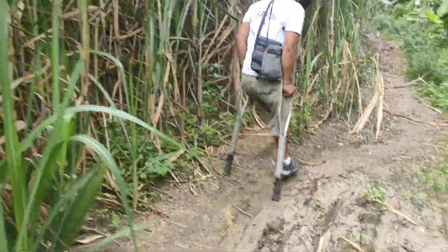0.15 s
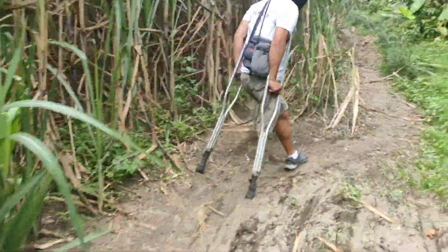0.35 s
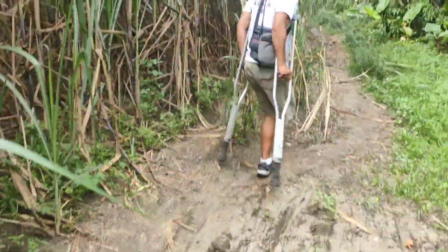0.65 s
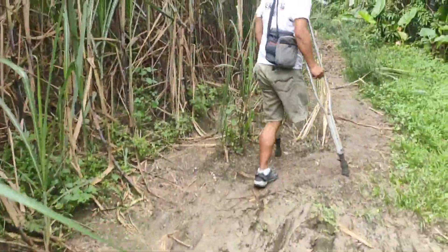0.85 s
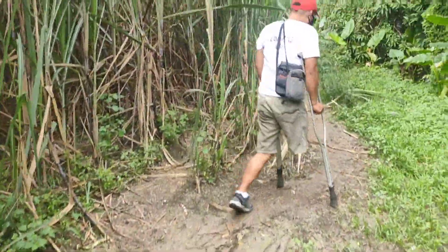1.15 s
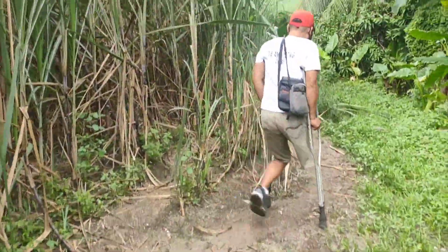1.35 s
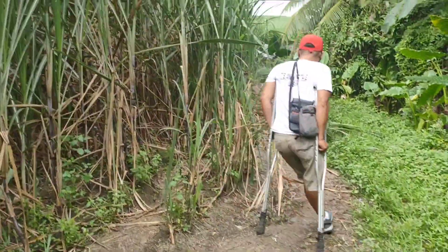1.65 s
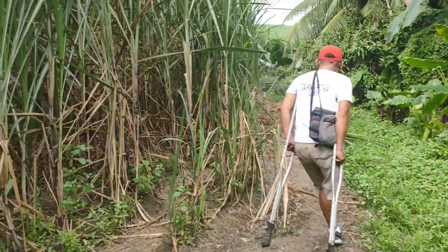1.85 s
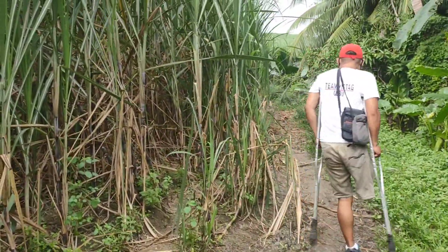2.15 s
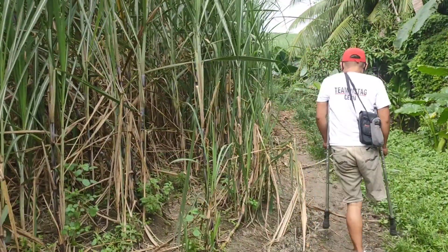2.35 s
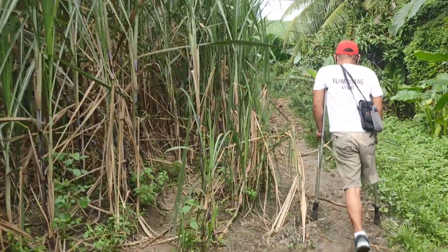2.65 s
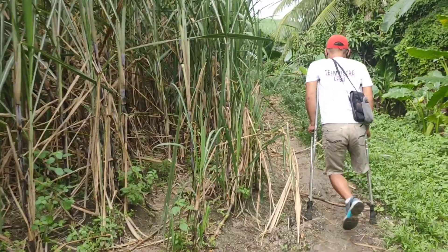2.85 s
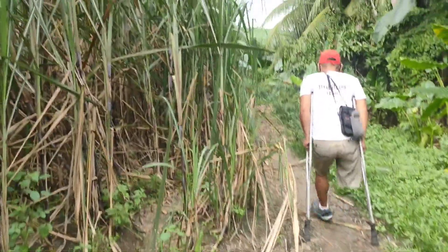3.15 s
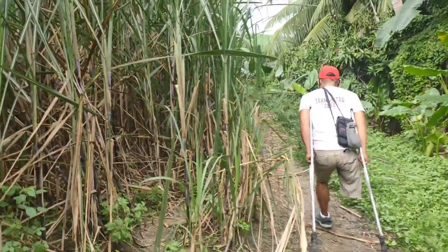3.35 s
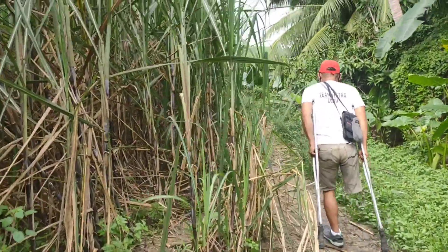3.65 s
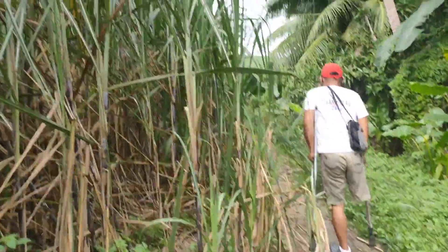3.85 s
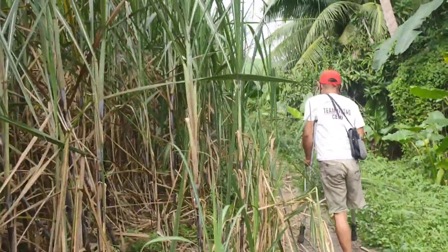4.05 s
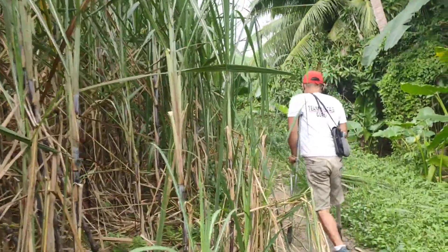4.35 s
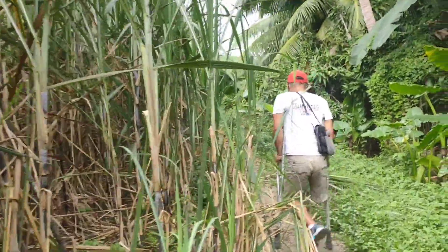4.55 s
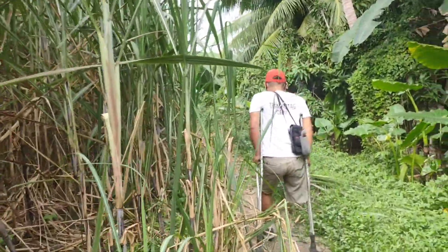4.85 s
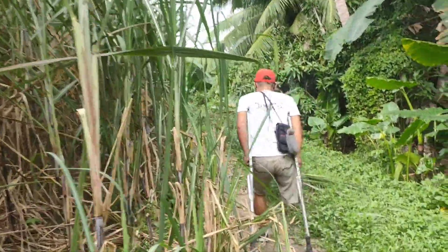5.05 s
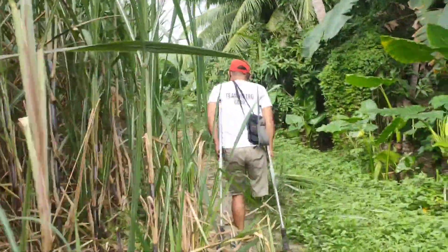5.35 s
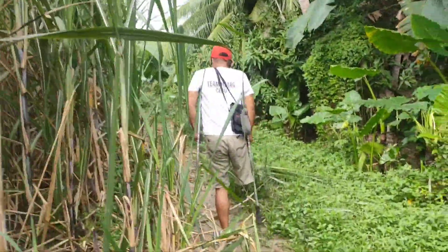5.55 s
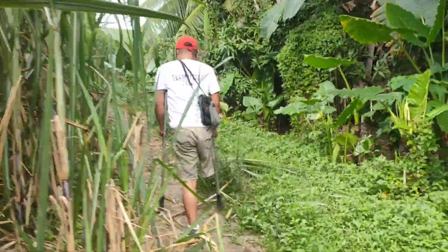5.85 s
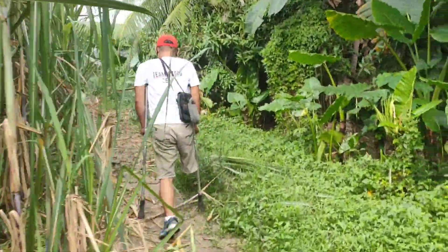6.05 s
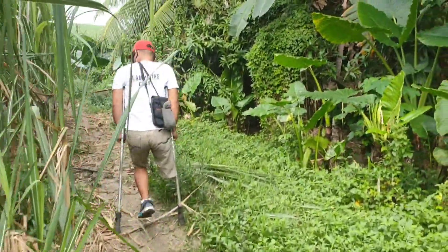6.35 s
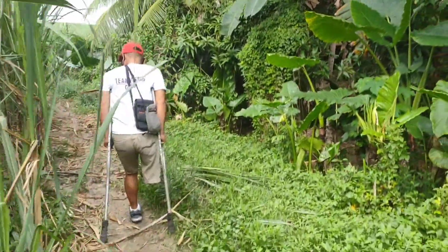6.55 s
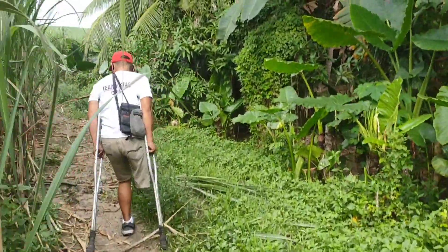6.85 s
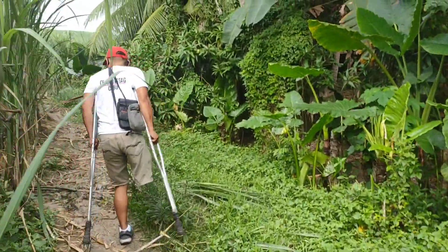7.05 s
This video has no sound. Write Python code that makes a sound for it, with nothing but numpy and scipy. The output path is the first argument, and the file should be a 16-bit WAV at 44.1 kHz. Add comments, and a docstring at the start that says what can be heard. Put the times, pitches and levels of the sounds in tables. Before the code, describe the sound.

Uneven soft pats, crisp crunches and crutch rattles over faint outdoor hiss, with one loud dry snap near six seconds and close leaf rustling.

```python
"""A muddy path beside a cane field, where a man walks past on metal crutches.
The crutches clack, tips and shoe pat the mud, dry litter crunches and a cane stalk cracks under a tip: noise
bursts shaped by resonances, with a short scattered tail. Leaves rustle and brush past close by as clumpy
hiss with clicks, light wind touches the microphones as low noise, and a small metal part tinks as narrow
rings. Behind lie coloured noise for hiss, rumble, throb and insects, and sine tones for a hum and whistle."""
import sys
import numpy as np
from scipy import signal
from scipy.fft import rfft, irfft, next_fast_len
from scipy.io import wavfile
from scipy.ndimage import uniform_filter1d, map_coordinates

SR = 44100
rng = np.random.default_rng(int(sys.argv[2]) if len(sys.argv) > 2 else 0)


def wrap_up_sound(samples):
    """Save the sound to the file named by the first command line argument, as 16-bit audio."""
    columns = np.atleast_2d(samples).T
    # keep every value between -1 and 1, then stretch to whole-number steps
    tamed = np.clip(columns, -1, 1)
    steps = np.round(tamed * 32767).astype(np.int16)
    wavfile.write(sys.argv[1], SR, steps)


N = 317961
TIME = np.arange(N) / SR  # s

# Spectra, here and below. Each row: frequency in Hz, relative density in dB per Hz.
# Level curves, here and below. Each row: time in s, level in dB.
# Likeness of left and right. Each row: frequency in Hz, correlation from -1 to 1.
# Far foliage hiss: spectrum, level curve, likeness.
AIR_SPECTRUM = [(50, -35), (100, -2.5), (310, -1.5), (750, -6.5), (1700, -10), (5500, -13), (7400, -11),
                (11400, -14.5), (13000, -21.5), (15800, -12.5)]
AIR_LEVEL = [(0, -54), (2.3, -55), (3.2, -53.5), (5.6, -53.5), (6.35, -53.5), (7.2, -52)]
AIR_LIKENESS = [(130, 1), (290, 0.83), (640, 0.082), (1400, 0.14), (3100, -0.057)]
# Low rumble: spectrum, level curve, likeness.
RUMBLE_SPECTRUM = [(10, -10), (35, -5), (65, 0.5), (100, -2.5), (160, -13.5), (1500, -41)]
RUMBLE_LEVEL = [(0, -62.5), (1, -55.5), (1.5, -59.5), (4.5, -62.5), (6, -55.5), (7.2, -51.5)]
RUMBLE_LIKENESS = [(30, 1.0), (150, 0.92)]
# Deep throb: spectrum, level curve.
THROB_SPECTRUM = [(25, -57), (48, 20.5), (56, 33), (66, -20), (300, -74)]
THROB_LEVEL = [(1.8, -68.5), (5.4, -60.5), (7.2, -55)]
# Insect chorus: spectrum.
INSECT_SPECTRUM = [(3000, -52), (6200, -14), (6900, 1), (7300, 8), (7900, 1), (9300, 0.5), (11000, -16),
                   (16000, -49)]
# Faint far hum: level curve.
HUM_LEVEL = [(0, -68), (.88, -65), (1.0, -70)]
# Faint far whistle. Each row: time in s, pitch in Hz, level in dB.
WHISTLE = [(.15, 988, -72), (.2, 1065, -64), (.245, 1010, -69)]
# Wind on the microphones. Each row: centre in s, level in dB, length in s, left over right in dB.
GUSTS = [(1.726, -50.5, 0.073, 21.5), (6.778, -52.5, 0.035, 24), (6.942, -42, 0.059, 3)]
# Wind: spectrum.
GUST_SPECTRUM = [(15, -6), (60, 9.5), (110, -3), (170, -25), (1500, -89)]
# Sweeps of a leg or crutch through dry leaves. Each row: time of height in s, level in dB, length in s.
SWISHES = [(0.42, -54, 0.04), (0.687, -50, 0.04), (0.954, -49.5, 0.082), (1.042, -53, 0.039),
           (1.21, -51, 0.018), (1.735, -56, 0.013), (1.776, -54, .014), (2.88, -56.5, 0.11),
           (3.088, -49, 0.013), (3.196, -50.5, 0.11), (3.447, -55, 0.035), (3.874, -56, 0.059),
           (4.14, -51.5, 0.11), (4.188, -43.5, 0.015), (4.218, -46, 0.015), (4.281, -46, 0.017),
           (4.427, -56, 0.13), (4.847, -57.5, 0.1), (5.3, -55, 0.054), (5.484, -55.5, 0.074),
           (7.176, -53.5, 0.036)]
# Dry leaves: spectrum.
RUSTLE_SPECTRUM = [(300, -6.5), (1000, -11), (3000, -10.5), (6500, -8), (8300, -2.5), (9500, -2),
                   (11200, -10), (15500, -12.5)]
# Balance of all leaves. Each row: frequency in Hz, left over right in dB.
LEAF_BALANCE = [(7000, 0), (9800, 9), (11000, 9.5), (13500, 0)]
# Leaves: likeness.
LEAF_LIKENESS = [(300, 1), (1400, -0.22), (3100, -0.35), (7000, 0.096)]
# Leaves sliding past close by. Each row: time of height in s, level in dB, build-up in s, release in s,
# top from pointed (1; less acts as 1) to round (2).
BRUSHES = [(5.78, -38.5, 0.082, 0.1, 1.12), (7.003, -32.5, 0.11, 0.061, 0.77)]
# One spectrum per brushing leaf.
BRUSH_SPECTRA = [
    [(150, -12), (440, 4.5), (1100, -8.5), (1650, -0.5), (2250, 0), (2850, -11), (3600, -4), (4700, 3),
     (5750, -3), (6700, 2), (7700, -3.5), (9700, 3), (12000, -5), (15800, -8.5)],
    [(150, -14), (650, 0), (1400, -6.5), (2800, -6), (4700, -3), (6800, -1.5), (9200, 3.5), (11300, -5),
     (16000, -4)],
]
# Leaf edge snags and lets go. Each row: time of height in s, level in dB.
SNAGS = [(5.663, -39.5), (5.686, -44.5), (5.985, -44.5), (6.744, -41), (6.788, -42.5), (6.83, -41),
         (6.864, -37), (6.892, -42), (6.981, -35)]
# Leaf flapping as it slips off: spectrum.
FLAP_SPECTRUM = [(200, -28), (550, 0), (800, 0.5), (1100, -8), (8000, -23)]
# Tinks of the small metal part. Each row: time of height in s, level in dB.
TINKS = [(1.549, -50), (2.014, -53), (3.855, -55), (5.25, -54)]
# Shoe and rubber tips landing in mud. Each row: start in s, level in dB, fall in s (at least 0.001),
# pitch of the pat in Hz.
STEPS = [(0.379, -41.5, 0.0036, 700), (0.391, -42, 0.0059, 1440), (0.401, -39, 0.0063, 213),
         (0.9054, -35, 0.0041, 800), (1.117, -43, 0.024, 1400), (1.236, -45.5, 0.01, 885),
         (2.6215, -43, 0.015, 1800), (3.733, -45, 0.01, 297), (3.815, -45.5, 0.011, 686),
         (3.9397, -29, 0.0012, 1200), (3.9407, -27, 0.00091, 3000), (4.2862, -37, 0.0024, 1210),
         (4.437, -42.5, .003, 2000), (6.131, -44.5, 0.011, 790), (6.466, -42, 0.011, 1400),
         (7.172, -45.5, 0.086, 740)]
# Leaves and twigs crunched under a tip. Each row: time in s, level in dB, left over right in dB,
# build-up in s, fall in s, favoured pitch in Hz.
CRUNCHES = [(0.526, -32.5, 3.5, 0.0023, 0.0057, 11000), (1.0713, -30, 11, 0.00033, 0.00067, 9800),
            (3.378, -38, -3, .003, .005, 8600), (3.7365, -25, -10, 0.00089, 0.0006, 8900),
            (3.735, -26.5, 1, 0.0067, 0.0051, 6800), (3.777, -35, 8, 0.0034, 0.0044, 10800),
            (4.205, -33, 2, .002, 0.0036, 9000), (5.246, -34, -2, 0.0023, 0.009, 9000),
            (6.599, -37.5, 5, 0.0036, 0.003, 13000)]
# Resonance of the litter. Each row: pitch in Hz, width in Hz, level in dB.
LITTER_MODES = [(8260, 1500, 3)]
# Direct sound of the crunches: spectrum.
LITTER_TICK = [(150, -26), (500, -2), (4000, -5.5), (8000, 4.5), (16000, -3.5)]
# Fibres of the dry stalk breaking. Each row: time in s, level in dB, left over right in dB,
# build-up in s, fall in s, favoured pitch in Hz.
CRACKS = [(5.9996, -10.5, -.5, 0.00089, 0.00079, 6850), (6.0007, -11.5, -0.55, 0.00024, 0.0021, 10500)]
# Resonances of the stalk. Each row: pitch in Hz, width in Hz, level in dB.
STALK_MODES = [(3230, 470, -13), (5930, 480, -1), (6720, 480, -4), (7790, 260, -2), (9880, 400, 1),
               (11200, 500, -7)]
# Direct sound of the cracks: spectrum.
CRACK_TICK = [(150, -15), (500, -15), (1700, -10), (4200, -21), (5300, -1), (10000, -0.5), (16000, -3)]
# Crutch rattles. Each row: time in s, level in dB, left over right in dB, build-up in s, fall in s,
# favoured pitch in Hz.
CLACKS = [(1.1028, -34, 1, 0.0006, 0.004, 4200), (1.1137, -16.5, -10, 0.00016, 0.00034, 5970),
          (1.116, -21, 1, 0.0012, 0.0017, 9900), (1.1267, -20, -1, 0.0007, 0.0009, 7040),
          (1.1288, -31, -4, 0.00027, 0.002, 4720), (2.619, -30.5, 9, 0.00029, 0.0016, 4800),
          (2.6232, -35.5, -2, 0.012, 0.0055, 7000), (2.640, -41.5, -1, .003, 0.027, 5660),
          (3.941, -33, -2, 0.00047, 0.001, 5670), (4.2877, -36, -6, 0.0005, 0.0031, 8000),
          (5.975, -38, -6, 0.0012, 0.0041, 4000)]
# Resonances of the crutch tube. Each row: pitch in Hz, width in Hz, level in dB.
TUBE_MODES = [(4080, 200, 0.5), (4560, 260, 3), (6480, 240, -1), (7700, 300, 0), (8400, 400, 5),
              (9780, 240, 3), (14900, 500, -4)]
# Direct sound of the clacks: spectrum.
CLACK_TICK = [(150, -26), (400, 4), (3000, 0), (8500, 8), (12000, 1.5), (16000, 8)]

HUM_HZ = 278.7
SWISH_RISE, SWISH_FALL, SWISH_ROUND = 1, 1.91, 2.2  # rise and fall as shares of the length
SNAG_RISE_S, SNAG_FALL_S, SNAG_ROUND = 0.008, 0.017, 1
FLAP_S, FLAP_DB, FLAP_RISE_S, FLAP_FALL_S, FLAP_ROUND = 6.993, -39.5, .02, .016, 2
CATCH_DB = -10  # clicks of catching edges against the sliding hiss
GRAIN_DB, GRAINS_PER_S = 1.1, 330  # stick and slip in small clumps
SWISH_PATCH_DB, BRUSH_PATCH_DB = 4.5, 3.5  # depth of the flicker in narrow bands
TINK_HZ, TINK_WIDTH_HZ, TINK_RISE_S, TINK_FALL_S, TINK_ROUND = 12130, 400, .003, .010, 2.4
SPOT_DB, SPOT_OCTAVES = 5.5, 0.2  # the struck spot favours one range of pitch
IMPACT_SPREAD_DB = 5  # inequality of the tiny impacts in a snap
TUBE_RING_DB, LITTER_RING_DB, STALK_RING_DB = 13.5, -1, 5
SPLINTER_S, SPLINTER_DB, SPLINTER_RISE_S, SPLINTER_FALL_S = 6.003, -34, .002, 0.028
SPLINTER_HZ, SPLINTER_WIDTH_HZ = 9930, 450
EDGE_HZ, OFFSET = 15800, .0028


def gain_of(db):
    """Decibels to gain."""
    return 10 ** (np.asarray(db) / 20)


def evened(x):
    """Scales to rms 1."""
    return x / np.sqrt(np.mean(x ** 2) + 1e-20)


def read(points, hz):
    """Interpolates a table on a log-frequency axis."""
    f, value = np.transpose(points)
    return np.interp(np.log(hz + 1), np.log(f + 1), value)


def level(rows):
    """A dB curve as a gain per sample, silent outside its span."""
    s, db = np.transpose(rows)
    inside = 1. * ((TIME > s[0] - .02) & (TIME < s[-1] + .02))
    return gain_of(np.interp(TIME, s, db)) * uniform_filter1d(inside, 441)


def sides(pan_db):
    """Left and right gains for a level difference."""
    return gain_of(np.array([[.5], [-.5]]) * pan_db)


def add(mix, s, sound):
    """Adds a stereo sound at time s."""
    part = mix[:, max(round(s * SR), 0):][:, :sound.shape[1]]
    part += sound[:, :part.shape[1]]


def white():
    """Two unrelated noises."""
    return rng.standard_normal((2, N))


def wander(per_s):
    """A random curve of rms 1 with per_s new values a second."""
    return evened(np.interp(TIME * per_s, np.arange(8000), rng.standard_normal(8000)))


def colour(x, spectrum, likeness=None, balance=None):
    """Gives a stereo pair a spectrum, a left-right likeness and a balance; rms 1."""
    size = next_fast_len(N)
    z, hz = rfft(x, size), np.fft.rfftfreq(size, 1 / SR)
    if likeness is not None:
        c = np.clip(read(likeness, hz), -1, 1)
        z = np.array([z[0], c * z[0] + np.sqrt(1 - c ** 2) * z[1]])
    if balance is not None:
        z = z * sides(read(balance, hz))
    return evened(irfft(z * gain_of(read(spectrum, hz)), size)[:, :N])


def patchy(x, depth_db, width_hz, length_s):
    """Narrow bands of the noise swell and fade independently, giving an uneven, flickering hiss."""
    z = signal.stft(x, nperseg=512, noverlap=384)[2]
    band = np.arange(z.shape[1]) * SR / 512 / width_hz
    moment = np.arange(z.shape[2]) * 128 / SR / length_s
    grid = np.meshgrid(band, moment, indexing="ij")
    patches = evened(map_coordinates(rng.standard_normal((200, 900)), grid, order=1, mode="wrap"))
    z = z * gain_of(depth_db * np.tanh(patches))
    return signal.istft(z, nperseg=512, noverlap=384)[1][:, :N]


def tone(hz, rows):
    """A sine with a level curve."""
    return level(rows) * np.sqrt(2) * np.sin(2 * np.pi * np.cumsum(hz) / SR)


def swell(s, db, rise_s, fall_s, roundness):
    """A gain that builds up to its height at time s and dies away."""
    away = np.maximum((s - TIME) / max(rise_s, 1e-3), (TIME - s) / max(fall_s, 1e-3))
    return gain_of(db) * np.exp(-np.minimum(away, 20) ** max(roundness, 1))


def together(gains):
    """Overlapping swells add in power."""
    return np.sqrt(sum(gain ** 2 for gain in gains))


def ringing(hz, width_hz):
    """A narrow, slightly unsteady ring of rms 1: noise through a resonance twice."""
    ring = signal.iirpeak(hz, hz / width_hz, SR)
    return evened(signal.lfilter(*ring, signal.lfilter(*ring, white())))


def air():
    """Far foliage hiss: noise whose bands flicker independently."""
    hiss = patchy(white(), depth_db=4.5, width_hz=148.2, length_s=0.037)
    return level(AIR_LEVEL) * colour(hiss, AIR_SPECTRUM, AIR_LIKENESS)


def rumble():
    """Low noise, nearly alike on both sides."""
    return level(RUMBLE_LEVEL) * colour(white(), RUMBLE_SPECTRUM, RUMBLE_LIKENESS)


def throb():
    """Deep narrow-band noise, identical on both sides; its narrow band makes it beat."""
    return level(THROB_LEVEL) * colour(white(), THROB_SPECTRUM)[0]


def insects():
    """A chorus blended into a band of noise, stronger on the right, its level wavering slightly."""
    return gain_of(-61.0 + 2.0 * wander(14)) * sides(-5.0) * colour(white(), INSECT_SPECTRUM)


def hum():
    """A faint far sine, unsteady in pitch and level."""
    return tone(HUM_HZ * (1 + 0.012 * wander(31.4)), HUM_LEVEL) * gain_of(2.0 * wander(19.0))


def whistle():
    """A faint far sine gliding up and back down."""
    s, hz, db = np.transpose(WHISTLE)
    return tone(np.interp(TIME, s, hz), np.transpose([s, db]))


def wind():
    """Each gust is a bell-shaped swell of low noise that buffets one microphone more than the other."""
    gusts = 0
    for s, db, length_s, pan_db in GUSTS:
        gusts = gusts + gain_of(db) * sides(pan_db) * np.exp(-.5 * ((TIME - s) / length_s) ** 2)
    return gusts * colour(white(), GUST_SPECTRUM)


def leaves(pressure, spectrum, catches_per_s, flutter_db, patch_db):
    """Rough leaf edges catch and slip: tiny clicks of uneven size over a sliding, clumpy hiss."""
    caught = rng.random(N) < catches_per_s / SR
    clicks = np.minimum(rng.exponential(1, N), 3) * caught * white()
    friction = gain_of(CATCH_DB) * evened(clicks) + white()
    friction *= gain_of(flutter_db * wander(90) + GRAIN_DB * wander(GRAINS_PER_S))
    friction = patchy(friction, patch_db, width_hz=263, length_s=.022)
    return pressure * colour(friction, spectrum, LEAF_LIKENESS, LEAF_BALANCE)


def rustle():
    """Each sweep of a leg or crutch stirs the dry leaves along the path."""
    pressure = together(swell(s, db, SWISH_RISE * length_s, SWISH_FALL * length_s, SWISH_ROUND)
                        for s, db, length_s in SWISHES)
    return leaves(pressure, RUSTLE_SPECTRUM, catches_per_s=370, flutter_db=2, patch_db=SWISH_PATCH_DB)


def brushes():
    """Two leaves drag past close by, their dry edges snagging on the way; the last one flaps free."""
    flap = swell(FLAP_S, FLAP_DB, FLAP_RISE_S, FLAP_FALL_S, FLAP_ROUND)
    out = flap * colour(white(), FLAP_SPECTRUM, LEAF_LIKENESS)
    snags = together(swell(s, db, SNAG_RISE_S, SNAG_FALL_S, SNAG_ROUND) for s, db in SNAGS)
    strokes = [(swell(*row), spectrum) for row, spectrum in zip(BRUSHES, BRUSH_SPECTRA)]
    for pressure, spectrum in strokes + [(snags, RUSTLE_SPECTRUM)]:
        out = out + leaves(pressure, spectrum, catches_per_s=1500, flutter_db=0.3, patch_db=BRUSH_PATCH_DB)
    return out


def metal_tinks():
    """A small metal part, likely the zip pull of his bag, rings at one high pitch as he moves."""
    jolts = together(swell(s, db, TINK_RISE_S, TINK_FALL_S, TINK_ROUND) for s, db in TINKS)
    return ringing(TINK_HZ, TINK_WIDTH_HZ) * jolts


def thicket(x, t60_s=0.29, early_s=0.0089, early_db=4, dull_hz=12000):
    """The wall of stalks scatters each sound into a short, diffuse, slightly duller tail."""
    t = np.arange(SR // 2) / SR
    shape = gain_of(-60 * t / t60_s) + gain_of(early_db) * np.exp(-t / early_s)
    shape *= 1 - np.exp(-t / 0.0015)
    lowpass = signal.butter(2, dull_hz, fs=SR)
    taps = signal.lfilter(*lowpass, rng.standard_normal((2, len(t))) * shape)
    taps /= np.linalg.norm(taps, axis=1, keepdims=True)
    return signal.fftconvolve(x, taps, axes=1)[:, :N]


def steps(rise_s=0.00099, damping=0.67, dull=8.7, wet_db=-28):
    """Mud does not ring: each landing is a short dull pat with a little wet fizz on top."""
    out, size = np.zeros((2, N)), 8192
    t, hz = np.arange(size) / SR, np.fft.rfftfreq(size, 1 / SR) + 1
    for s, db, fall_s, pitch_hz in STEPS:
        shape = (1 - np.exp(-t / rise_s)) * np.exp(-t / max(fall_s, 1e-3))
        # mostly common to both sides
        push = (rng.standard_normal(size) + .5 * rng.standard_normal((2, size))) * shape
        hump = 1 / (1 + 1j * (hz / pitch_hz - pitch_hz / hz) / damping)
        mud = hump / (1 + 1j * hz / (dull * pitch_hz))  # soft ground soaks up the highs
        pat = irfft(rfft(push) * (mud + gain_of(wet_db)))
        add(out, s, gain_of(db) * pat * np.linalg.norm(shape) / np.linalg.norm(pat[0]) / 2)
    return out


def snaps(rows, modes, tick, ring_db):
    """Each snap is a tight cluster of tiny impacts, heard directly and through the modes they ring."""
    out, size = np.zeros((2, N)), 8192
    t, hz = (np.arange(size) - size // 4) / SR, np.fft.rfftfreq(size, 1 / SR)
    # each mode is a band-pass: it rings near its pitch and fades on both sides
    ring = sum(gain_of(db) * 1j * hz * width_hz / (f ** 2 - hz ** 2 + 1j * hz * width_hz)
               for f, width_hz, db in modes)
    ring = ring * np.minimum(hz / modes[0][0], 1) ** 2  # weaker below the first mode
    body = gain_of(read(tick, hz)) + gain_of(ring_db) * ring
    for s, db, pan_db, rise_s, fall_s, spot_hz in rows:
        shape = np.exp(np.minimum(t / max(rise_s, 1e-4), -t / max(fall_s, 1e-4)))
        sizes = gain_of(IMPACT_SPREAD_DB * rng.standard_normal(size))
        impacts = rng.standard_normal((2, size)) * sizes * shape
        spot_db = SPOT_DB * np.exp(-.5 * (np.log2((hz + 1) / spot_hz) / SPOT_OCTAVES) ** 2)
        sound = irfft(rfft(impacts) * body * gain_of(spot_db))
        sound *= np.linalg.norm(shape) / np.linalg.norm(sound, axis=1, keepdims=True)
        add(out, s + t[0], gain_of(db) * sides(pan_db) * sound / 2)
    return out


def crunches():
    """Dry leaves and twigs break under a tip, with one broad resonance."""
    return snaps(CRUNCHES, LITTER_MODES, LITTER_TICK, LITTER_RING_DB)


def stalk_cracks():
    """The dry stalk cracks fibre after fibre and rings its modes."""
    return snaps(CRACKS, STALK_MODES, CRACK_TICK, STALK_RING_DB)


def splinter():
    """A splinter of the cracked stalk quivers on at one pitch."""
    quiver = swell(SPLINTER_S, SPLINTER_DB, SPLINTER_RISE_S, SPLINTER_FALL_S, 1)
    return quiver * ringing(SPLINTER_HZ, SPLINTER_WIDTH_HZ)


def crutch_clacks():
    """The crutches rattle and ring the modes of their metal tube."""
    return snaps(CLACKS, TUBE_MODES, CLACK_TICK, TUBE_RING_DB)


def scene():
    """The open air, wind and leaves, then the walker and the stalk with their echoes."""
    outdoors = air() + rumble() + throb() + insects() + hum() + whistle()
    near = wind() + rustle() + brushes() + metal_tinks()
    walker = steps() + crunches() + crutch_clacks()
    stalk = stalk_cracks()
    echoes = thicket(gain_of(-6.5) * walker)
    echoes += thicket(gain_of(-6.0) * stalk, t60_s=0.34, early_s=0.0072, dull_hz=14000)
    return outdoors + near + echoes + stalk + splinter() + walker


def record(dry):
    """The recorder's band limit and its small constant offset."""
    lowpass = signal.firwin(511, EDGE_HZ, window=("kaiser", 9), fs=SR)
    return OFFSET + signal.oaconvolve(dry, lowpass[None], "same")


dry = scene()
out = record(dry)
wrap_up_sound(out)
```